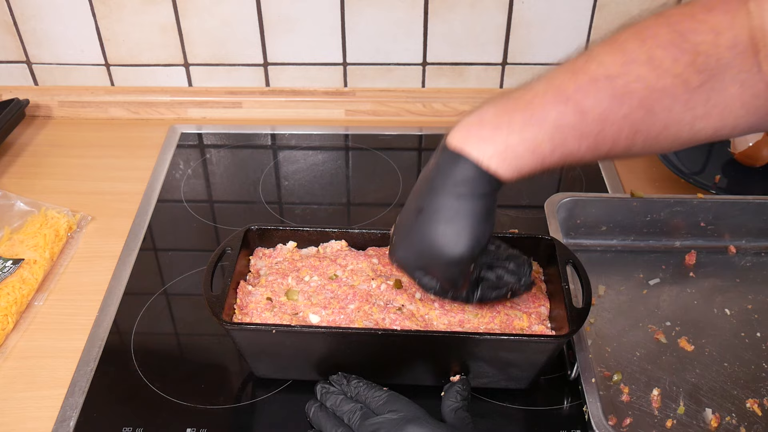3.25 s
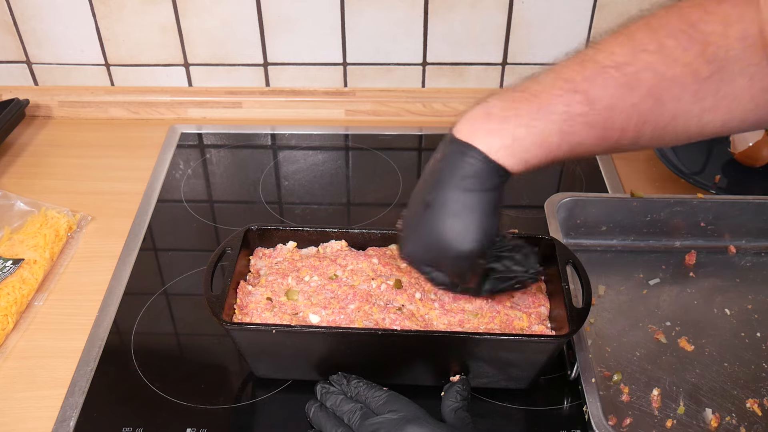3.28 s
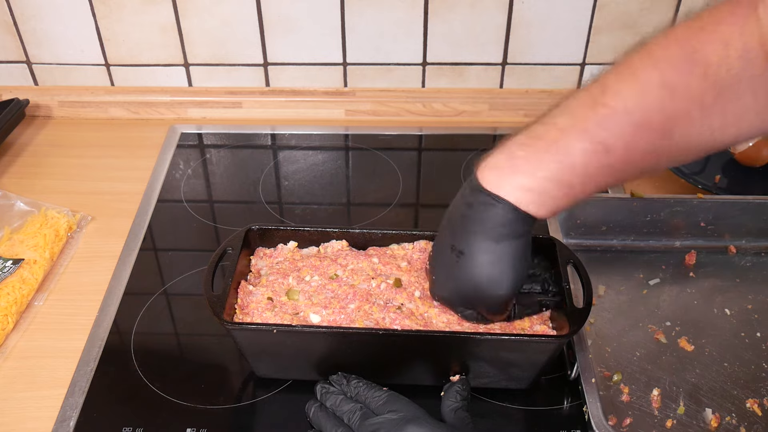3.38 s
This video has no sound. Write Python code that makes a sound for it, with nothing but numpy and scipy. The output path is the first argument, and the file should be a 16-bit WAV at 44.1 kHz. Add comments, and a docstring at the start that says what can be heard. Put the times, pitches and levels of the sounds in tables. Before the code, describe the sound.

A gloved hand pats minced meat into a heavy metal loaf pan with irregular hollow slaps, wet squishes and small sticky pops, while the pan knocks on a glass hob in a small tiled kitchen, close nearly mono microphone.

```python
"""Quiet room noise and a low counter shudder run throughout, while a metal loaf pan knocks now and then
on a glass hob in a small tiled kitchen. A gloved hand pats minced meat into the pan, with slaps made of
trapped-air pops, a soft splat and the pan's ring. Wet squishes and glove slides are crackling noise; later
the glove peels off in short rips and pops. Small blips and dull pushes stay drier than the slaps.
The microphone is nearly mono, with only faint hiss and a little diffuse treble at the sides."""
import sys
import numpy as np
from scipy import signal
from scipy.fft import rfft, irfft, next_fast_len
from scipy.io import wavfile
from scipy.ndimage import map_coordinates

SR = 44100
rng = np.random.default_rng(int(sys.argv[2]) if len(sys.argv) > 2 else 0)


def transcribe(u):
    """Save the signal u as a 16-bit wav file named by the first command-line argument.

    u: samples, shape (n,) or (channels, n), limited to [-1, 1]; the rate is SR.
    q: integer samples, one column per channel.
    """
    v = np.clip(np.atleast_2d(u).T, -1, 1)
    q = np.round(v * 32767).astype(np.int16)
    wavfile.write(sys.argv[1], SR, q)


N = 152145
T = np.arange(int(0.6 * SR)) / SR  # time axis of a single event, s

# Spectrum levels are relative: every noise is scaled to rms 1 before its own level is applied.
# the counter's low rumble: time_s, level_db
SHUDDER = [(0.0, -40.5), (0.06, -48), (0.31, -51), (0.34, -47.5), (0.63, -45.5), (0.86, -63), (0.98, -46.5),
           (1.34, -59.5), (1.47, -36.5), (1.82, -56), (1.92, -42.5), (2.22, -52.5), (2.35, -35.5),
           (2.44, -57), (2.49, -41), (2.59, -54), (2.87, -41), (2.94, -54), (3.13, -38), (3.33, -52),
           (3.42, -42), (3.45, -55)]
# colour of that rumble: frequency_hz, level_db (per Hz)
RUMBLE_SPECTRUM = [(10, -28), (24, -11), (31, 0), (38, -9), (55, -20), (120, -21), (200, -33), (600, -43),
                   (1500, -70)]
# colour of the room noise: frequency_hz, level_db (per Hz)
FLOOR_SPECTRUM = [(25, -15.5), (100, -9.5), (250, 1), (600, -9.5), (1100, -4), (1800, -16), (2600, -26),
                  (6000, -23), (16000, -27.5)]
FLOOR_DB = -58.5

# the pan knocks on the hob: start_s, level_db, second_corner_delay_s, second_corner_level_db
KNOCKS = [(0.0511, -23, .009, -15.5), (0.197, -19, .009, -11), (1.429, -27, .02, -3),
          (1.47, -15.5, .009, -7), (1.5261, -18, 0.01, -15), (1.9106, -9.5, .016, -0.5),
          (2.3305, -9.5, .015, -10.5), (2.757, -14, 0.013, -6)]
# damped clack of the base: pitch_hz, level_db, t60_s
CLACK_MODES = [(139, -4.5, 0.018), (410, -9.5, .012), (584, -7, .018), (822, 2.5, 0.0075),
               (1093, -9.5, 0.01)]
# grit under the base: frequency_hz, level_db (per Hz)
TICK_SPECTRUM = [(150, -5), (300, 1.5), (900, 3), (1250, 1), (1600, -8), (3000, -11), (4500, -24),
                 (7000, -21.5), (11000, -33), (16000, -58)]
# the weight of the pan settles: frequency_hz, level_db (per Hz)
THUD_SPECTRUM = [(20, -24), (60, 7), (120, 6.5), (175, -47), (260, -4), (500, -20.5), (1200, -70)]
# the filled pan and the hob under it: pitch_hz, level_db, t60_s
PAN_MODES = [(83.1, -21, 0.39), (119, -23, 0.43), (239.9, -23.5, 0.33), (343.7, -22.5, 0.32),
             (378, -21, 0.21), (527.5, -11, 0.12), (635, -23.5, 0.061), (707, -30, 0.39), (864, -28, 0.29),
             (966, -36, 0.49), (1207, -19, 0.11), (1400, -35.5, .2), (1603, -44.5, 0.45), (2830, -67, 0.46)]
RING_SCATTER_DB = 2
BOUNCE_SHRINK, BOUNCE_LOSS_DB = 0.65, 6  # last bounce: its flight over the one before, its loss
SETTLE_HZ, SETTLE_T60_S, SETTLE_DB = 117, 0.053, -7.5  # the hob flexes as the second corner lands

# wet meat squishes: peak_s, rise_s (over 20 dB), level_db
SQUISHES = [(.14, 0.1, -57.5), (.307, 0.07, -38.5), (.51, 0.017, -51.5), (.572, 0.029, -53),
            (.622, 0.065, -51), (.722, 0.013, -44.5), (.769, 0.023, -41.5), (.965, 0.05, -51.5),
            (1.035, 0.062, -47.5), (1.19, 0.0074, -38.5), (1.487, 0.088, -42), (1.668, 0.08, -37.5),
            (2.076, 0.047, -32), (2.122, 0.018, -46), (2.405, .02, -54), (2.483, 0.052, -35),
            (2.708, 0.016, -46), (2.868, 0.06, -35.5), (3.074, 0.029, -40.5), (3.239, 0.057, -36)]
# colour of a squish: frequency_hz, level_db (per Hz)
SQUISH_SPECTRUM = [(150, -1), (600, 0), (1700, -1.5), (2800, -3.5), (5000, -9.5), (10000, -12.5),
                   (12500, -21.5), (16000, -30)]
# the glove slides over the meat: peak_s, rise_s (over 20 dB), level_db
SLIDES = [(.77, 0.068, -35.5), (1.19, 0.083, -38)]
# colour of a slide: frequency_hz, level_db (per Hz)
SLIDE_SPECTRUM = [(150, -23), (300, -7), (450, -7.5), (620, -2), (900, -4.5), (1200, -4.5), (1700, -7),
                  (2450, 0.5), (3600, -7), (5000, -17.5), (9500, -16.5), (13000, -28), (16000, -34)]
CLUMPS_PER_S, CLUMP_DB = 220, 3

# the hand lands: start_s, level_db, fingers_delay_s, fingers_level_db
SLAPS = [(.273, -7.5, 0.026, -6), (1.6065, -10, .021, -11.5), (2.0419, -8.5, 0.02, -8),
         (2.454, -9.5, 0.023, -6.5), (2.839, -7, .027, -8.5), (3.2024, -12.5, .023, -21)]
# air trapped under the palm: pitch_hz, level_db, t60_s
POCKET_MODES = [(139, -12, 0.04), (244.5, -12.5, 0.023), (541, -0.5, 0.019), (938, 4.5, 0.0087),
                (1434, -9, 0.015), (2205, -7.5, 0.011), (2740, -27, 0.016)]
# sharp crack of a touch: frequency_hz, level_db (per Hz)
CRACK_SPECTRUM = [(200, 13), (900, -22.5), (2800, 3.5), (4500, -7.5), (7500, -16), (11000, -27),
                  (16000, -69)]
# soft mass flattening under the hand: frequency_hz, level_db (per Hz)
SPLAT_SPECTRUM = [(120, -2), (240, -3.5), (400, -7.5), (600, 2.5), (1100, -2), (1700, -4), (4000, -35.5)]
CONTACT_S = 0.0007
PALM_S, PALM_DB = 0.0095, -8  # the rest of the palm follows the first touch

# small air pockets blip out of the meat: start_s, pitch_hz, level_db
BLIPS = [(.62, 687, -39), (.766, 640, -32), (1.184, 624, -39), (3.056, 1217, -25)]
# the hand leans on the meat with a dull push: start_s, level_db
PUSHES = [(1.422, -25), (1.449, -28), (1.867, -33.5), (3.088, -36)]

# the glove peels off: start_s, length_s, level_db
PEELS = [(1.865, 0.0085, -36.5), (2.307, 0.0051, -25.5), (2.683, 0.0054, -32.5), (3.055, 0.0046, -27.5),
         (3.398, 0.0082, -38)]
# colour of the rip: frequency_hz, level_db (per Hz)
PEEL_SPECTRUM = [(150, 12), (500, -1), (900, 6.5), (1200, -1), (1800, -4), (2600, -1.5), (4000, -5.5),
                 (6400, -8), (9000, -8.5), (12000, -15), (16000, -25)]
# pop of the opening pocket: pitch_hz, level_db, t60_s
SUCTION_MODES = [(1214, -2.5, 0.031), (2330, -18, 0.019), (4170, -13.5, 0.01)]

# colour of the kitchen's reflections: frequency_hz, level_db
WALLS = [(60, -22), (130, 5), (180, -8.5), (330, 3.5), (1000, -1.5), (1800, -1), (2500, 0.5), (6000, -1),
         (15000, -5)]
# decay of the kitchen's tail: frequency_hz, t60_s
KITCHEN_DECAY = [(80, 0.21), (200, 0.7), (500, 0.4), (2500, 0.51), (7000, 0.41), (15000, 0.067)]
EARLY_T60_S, EARLY_DB, TAIL_DB = 0.077, -3, -8

# diffuse side signal relative to the middle: frequency_hz, level_db
WIDTH = [(100, -53), (500, -43.5), (1000, -61.5), (2000, -38), (4000, -25), (8000, -20), (13000, -27)]
# hiss of the side signal: frequency_hz, level_db (per Hz)
HISS_SPECTRUM = [(30, 4), (300, 2), (1200, 2.5), (3000, 2), (8000, -1.5), (12000, -4), (16000, -5)]
HISS_DB = -69.5
TOP_HZ = 15900  # the recorder's band limit


def amp(db):
    """Decibels to gain."""
    return 10 ** (np.asarray(db) / 20)


def unit(x):
    """Scale to rms 1."""
    return x / np.sqrt(np.mean(x ** 2) + 1e-20)


def fade(t60):
    """Exponential decay by 60 dB in t60 seconds."""
    return np.exp(-np.log(1000) * T / t60)


def onset(rise_s):
    """Exponential approach to full level, with time constant rise_s."""
    return 1 - np.exp(-T / rise_s)


def along(points, hz):
    """Read (frequency, value) points on a log frequency axis."""
    f, v = np.transpose(points)
    return np.interp(np.log(hz + 1), np.log(f + 1), v)


def filtered(x, response):
    """Multiply the spectrum of x by a response of frequency."""
    m = next_fast_len(len(x) + 8192)
    spectrum = rfft(x, m) * response(np.fft.rfftfreq(m, 1 / SR))
    return irfft(spectrum, m)[:len(x)]


def coloured(x, spectrum):
    """Shape x with a dB spectrum and scale it to rms 1."""
    return unit(filtered(x, lambda hz: amp(along(spectrum, hz))))


def noise(spectrum, size):
    """Coloured noise of rms 1."""
    return coloured(rng.standard_normal(size), spectrum)


def crackle(spectrum, rate, smooth):
    """Tiny bursts of random size, about rate a second, over a smooth hiss."""
    pops = (rng.random(N) < rate / SR) * rng.standard_normal(N)
    return unit(coloured(pops, spectrum) + smooth * noise(spectrum, size=N))


def add(track, s, sound):
    """Mix a sound in at time s."""
    i = max(round(s * SR), 0)
    part = sound[:max(len(track) - i, 0)]
    track[i:i + len(part)] += part


def ring(modes, scatter_db, detune):
    """Damped modes, a little different in level and pitch at each blow."""
    total = np.zeros(len(T))
    for k, (hz, db, t60) in enumerate(modes):
        level_chance, pitch_chance = rng.standard_normal(2)
        tone = np.sin(2 * np.pi * hz * (1 + detune * pitch_chance) * T)
        # neighbouring modes start with opposite signs
        total += (-1) ** k * amp(db + scatter_db * level_chance) * fade(t60) * tone
    return total


def kitchen(x, wet_db):
    """The direct sound, quick reflections from counter and tiles, and the room's tail."""
    hz, t, z = signal.stft(rng.standard_normal(len(T)), SR, nperseg=256)
    decay = np.exp(-np.log(1000) * t / along(KITCHEN_DECAY, hz)[:, None])
    tail = signal.istft(z * decay, SR, nperseg=256)[1][:len(T)]
    tail = unit(tail * onset(0.0099))
    early = unit(rng.standard_normal(len(T)) * fade(EARLY_T60_S) * onset(0.0043))
    answer = amp(TAIL_DB) * tail + amp(EARLY_DB) * early
    answer = filtered(answer, lambda f: amp(along(WALLS, f))) / np.sqrt(len(T))
    return x + amp(wet_db) * signal.fftconvolve(x, answer)[:len(x)]


def background():
    """The counter shudders under the pressing, over quiet room noise."""
    level_db = np.interp(np.arange(N) / SR, *np.transpose(SHUDDER))
    shudder = amp(level_db) * noise(RUMBLE_SPECTRUM, size=N)
    return shudder + amp(FLOOR_DB) * noise(FLOOR_SPECTRUM, size=N)


def pan():
    """The filled pan's ring swells up just after a blow."""
    return ring(PAN_MODES, scatter_db=RING_SCATTER_DB, detune=0.0033) * onset(0.0021)


def knocks(tick_db=-12, tick_t60=0.036, pan_db=-7, thud_db=-8, thud_rise_s=0.012, thud_t60=0.12):
    """The pan drops on one corner, then another, bounces once, and its weight thuds on the hob."""
    out = np.zeros(N)
    for s, db, second_s, second_db in KNOCKS:
        blow = np.zeros(len(T))
        bounce = (second_s * (1 + BOUNCE_SHRINK), second_db - BOUNCE_LOSS_DB)
        for delay, corner_db in [(0, 0), (second_s, second_db), bounce]:
            clack = ring(CLACK_MODES, scatter_db=2, detune=0.065) * onset(0.00026)
            tick = amp(tick_db) * noise(TICK_SPECTRUM, size=len(T)) * fade(tick_t60)
            add(blow, delay, amp(corner_db) * (clack + tick))
        flex = np.sin(2 * np.pi * SETTLE_HZ * T) * fade(SETTLE_T60_S)
        add(blow, second_s, amp(second_db + SETTLE_DB) * flex)
        thud = amp(thud_db) * noise(THUD_SPECTRUM, size=len(T)) * onset(thud_rise_s) * fade(thud_t60)
        add(out, s, amp(db) * (kitchen(blow, wet_db=-2) + thud + amp(pan_db) * pan()))
    return out


def swells(rows, release_s):
    """Envelopes that climb 20 dB over their rise and fall 20 dB over the release."""
    t = np.arange(N) / SR
    total = np.zeros(N)
    for s, rise, db in rows:
        drop_db = 20 * np.maximum((s - t) / rise, (t - s) / release_s)
        total += amp(db - drop_db)
    return total


def clumps():
    """Sticky meat gives way in uneven spurts: a smooth random level curve."""
    knots = rng.standard_normal(int(N * CLUMPS_PER_S / SR) + 4)
    curve = map_coordinates(knots, [np.arange(N) * CLUMPS_PER_S / SR])
    return unit(amp(CLUMP_DB * curve))


def meat():
    """Air and juice squeeze out under the glove; the glove rubs over the surface."""
    squish = swells(SQUISHES, release_s=0.018) * clumps()
    squish = squish * crackle(SQUISH_SPECTRUM, rate=2500, smooth=0.59)
    slide = swells(SLIDES, release_s=0.03) * clumps()
    slide = slide * crackle(SLIDE_SPECTRUM, rate=2000, smooth=1.0)
    return kitchen(squish, wet_db=-0.5) + kitchen(slide, wet_db=-9)


def slaps(pocket_db=-1, crack_db=-15, crack_t60=0.048, pan_db=-1,
          splat_db=-13, splat_rise_s=0.00067, splat_t60=0.064):
    """Hand, palm and fingers each pop trapped air; the meat splats and the blow rings the pan."""
    out = np.zeros(N)
    for s, db, fingers_s, fingers_db in SLAPS:
        splat = noise(SPLAT_SPECTRUM, size=len(T)) * onset(splat_rise_s) * fade(splat_t60)
        blow = amp(splat_db) * splat
        for delay, touch_db in [(0, 0), (PALM_S, PALM_DB), (fingers_s, fingers_db)]:
            pop = -amp(pocket_db) * ring(POCKET_MODES, scatter_db=3, detune=0.054)
            crack = amp(crack_db) * noise(CRACK_SPECTRUM, size=len(T)) * fade(crack_t60)
            add(blow, delay, amp(touch_db) * (pop + crack) * onset(CONTACT_S))
        add(out, s, amp(db) * (kitchen(blow, wet_db=-1) + amp(pan_db) * pan()))
    return out


def blips(rise_s=0.0013, t60=0.045, sag_per_s=0.95):
    """A pocket rings briefly and sags in pitch as it closes."""
    out = np.zeros(N)
    for s, hz, db in BLIPS:
        phase = 2 * np.pi * np.cumsum(hz * np.exp(-sag_per_s * T)) / SR
        add(out, s, amp(db) * np.sin(phase) * onset(rise_s) * fade(t60))
    return kitchen(out, wet_db=-12)


def pushes(push_hz=75, rise_s=0.0048, t60=0.044):
    """A soft load gives a few slow, quickly damped swings and no pan ring."""
    out = np.zeros(N)
    swing = np.sin(2 * np.pi * push_hz * T) * onset(rise_s) * fade(t60)
    for s, db in PUSHES:
        add(out, s, amp(db) * swing / np.abs(swing).max())
    return kitchen(out, wet_db=-10.5)


def peels(rise_s=0.00072, release_s=0.0011, pan_db=-8, pop_db=2, pop_delay_s=0.0024):
    """Sticky meat lets go of the glove in a short rip and a pop that tugs at the pan."""
    envelope, pops, tug = np.zeros((3, N))
    for s, length, db in PEELS:
        release = np.exp(-np.maximum(T - length, 0) / release_s)
        add(envelope, s, amp(db) * onset(rise_s) * release)
        pop = ring(SUCTION_MODES, scatter_db=5.5, detune=0.1)
        add(pops, s + pop_delay_s, amp(db + pop_db) * pop)
        add(tug, s, amp(db + pan_db) * pan())
    rip = envelope * crackle(PEEL_SPECTRUM, rate=9000, smooth=0.39)
    return kitchen(rip + pops, wet_db=-1) + tug


def scene():
    """Everything is central; only faint hiss and a little diffuse treble spread to the sides."""
    mid = background() + knocks() + meat() + slaps() + blips() + pushes() + peels()
    hz, t, z = signal.stft(mid, SR, nperseg=512)
    random_phase = np.exp(2j * np.pi * rng.random(z.shape))
    diffuse = z * random_phase * amp(along(WIDTH, hz))[:, None]
    side = signal.istft(diffuse, SR, nperseg=512)[1][:N]
    side = side + amp(HISS_DB) * noise(HISS_SPECTRUM, size=N)
    return np.array([mid + side, mid - side])


def record(dry):
    """The recorder cuts steeply above its band limit."""
    return np.array([filtered(channel, lambda hz: 1 / (1 + (hz / TOP_HZ) ** 120)) for channel in dry])


dry = scene()
out = record(dry)
transcribe(out)
```